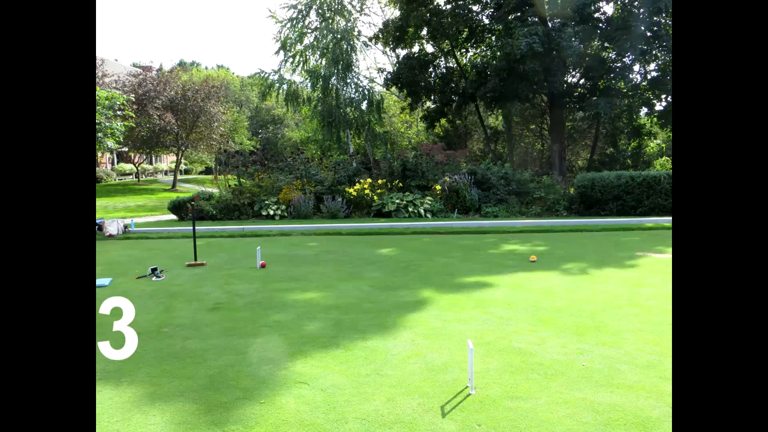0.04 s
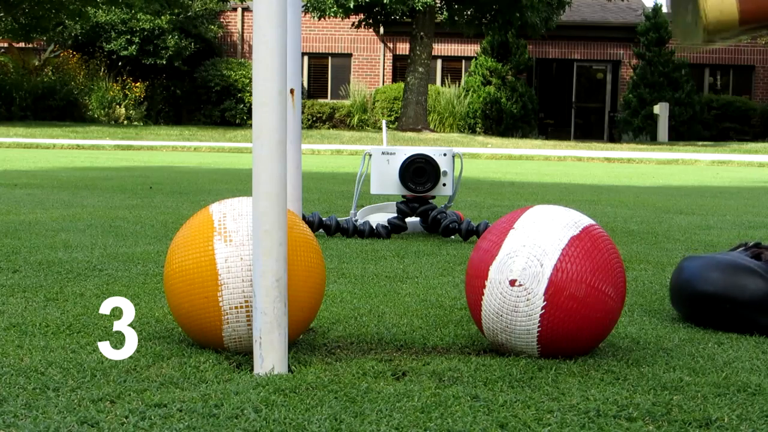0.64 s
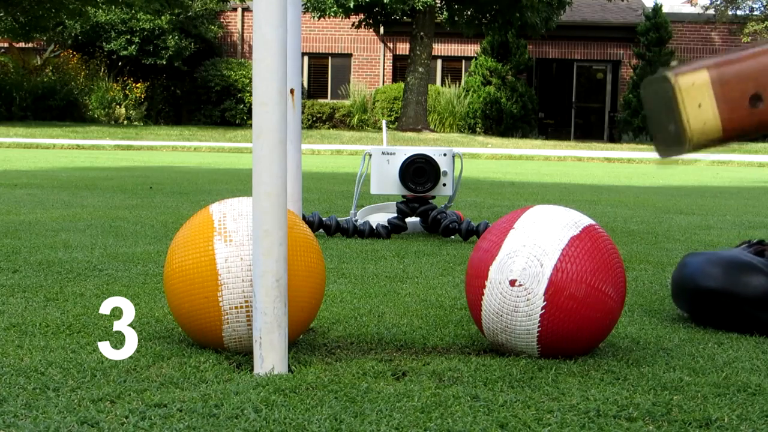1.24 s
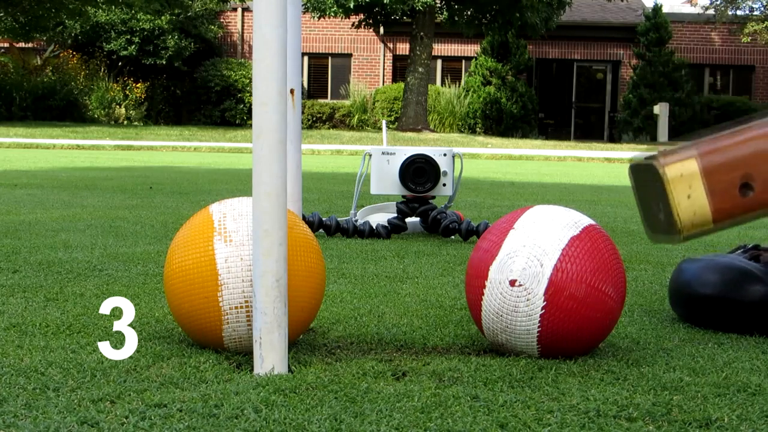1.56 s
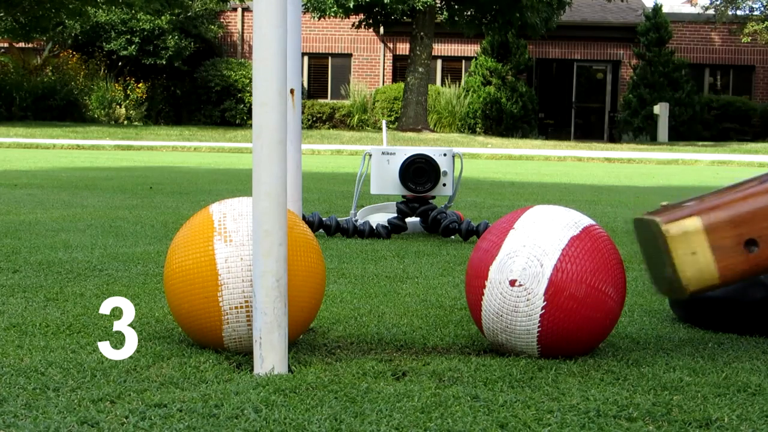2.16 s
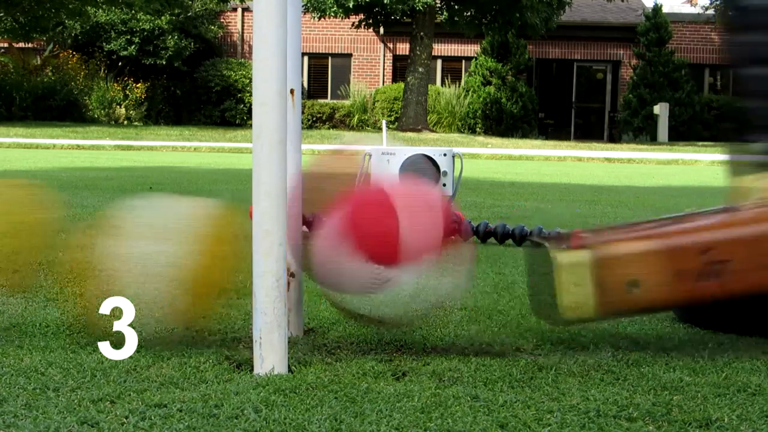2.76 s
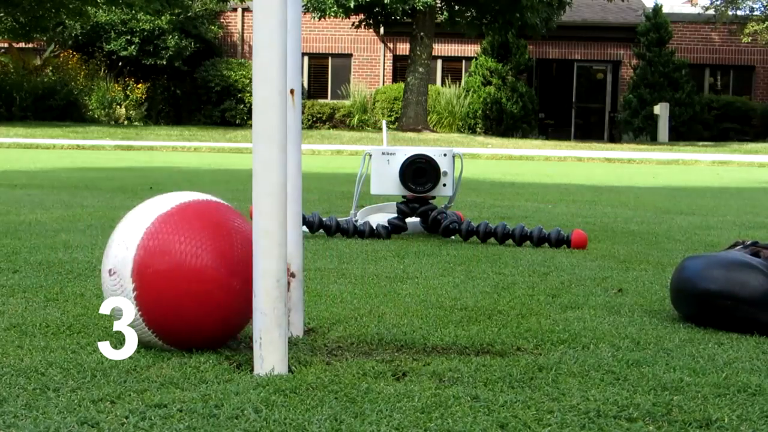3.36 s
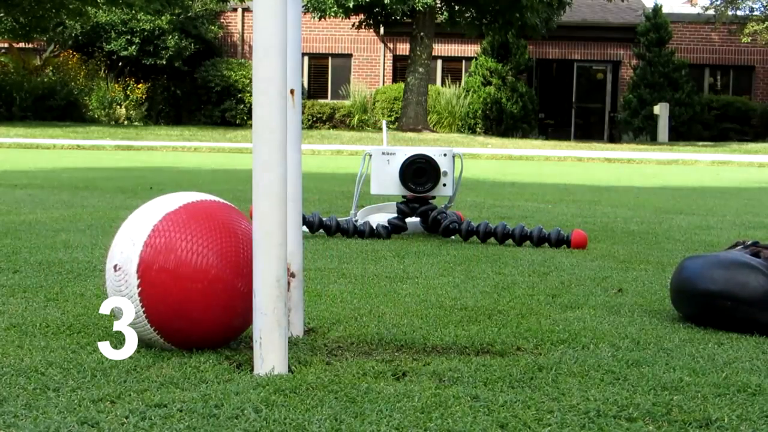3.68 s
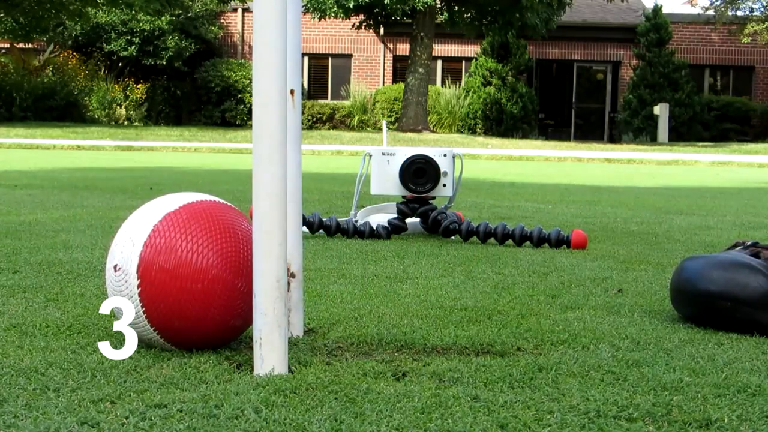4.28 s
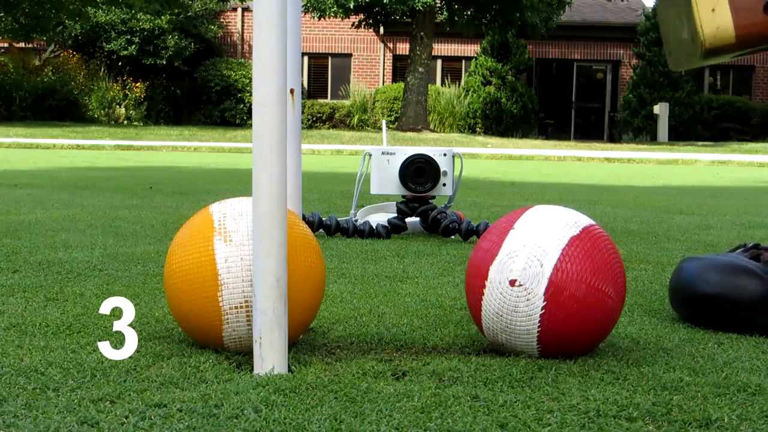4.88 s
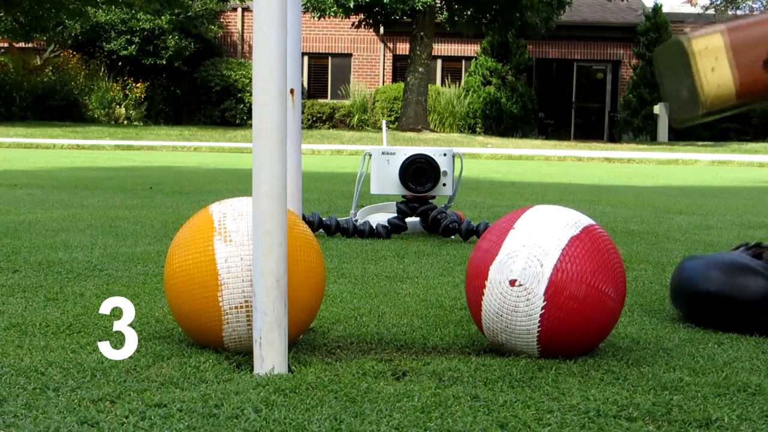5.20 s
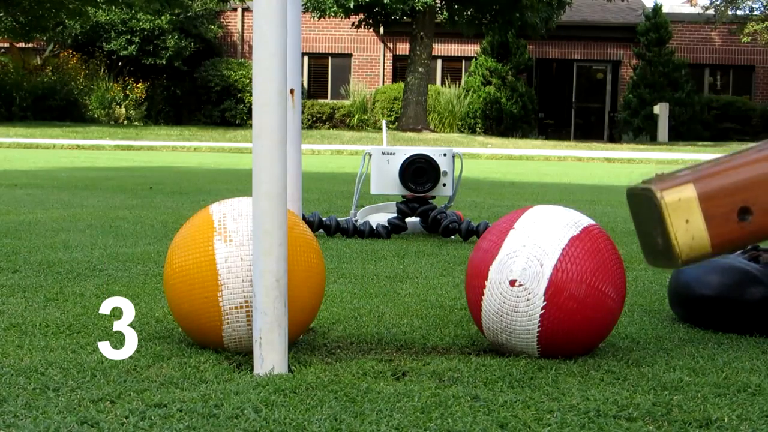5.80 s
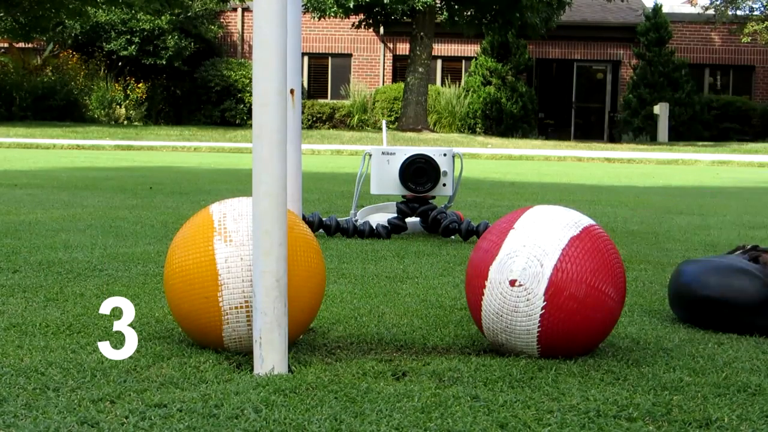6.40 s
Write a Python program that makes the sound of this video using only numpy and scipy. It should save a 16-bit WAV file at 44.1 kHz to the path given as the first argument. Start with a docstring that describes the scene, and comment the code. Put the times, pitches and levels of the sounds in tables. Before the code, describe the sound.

A wooden mallet cracks a croquet ball into another, followed by a few quick knocks, over faint insects on a lawn.

```python
"""A lawn beside a building: cicadas, a katydid and a tree cricket sing over rumble, hiss and a thin whine.
A wooden mallet cracks into a croquet ball close by; the ball clacks into a second ball, hops on the
turf and knocks the hoop. Each hit is a few fast-dying tones, and the building throws the crack back.
The crack overloads the microphone and ducks its gain.
The sound cuts in from silence and ends by jumping back to the quiet before the stroke."""
import sys
import numpy as np
from scipy import signal
from scipy.fft import rfft, irfft
from scipy.io import wavfile
from scipy.ndimage import minimum_filter1d

SR = 44100
rng = np.random.default_rng(int(sys.argv[2]) if len(sys.argv) > 2 else 0)


def wav_out(sig):
    """Save sig, one row per channel (or a flat mono array), as 16-bit PCM at SR to the path in sys.argv[1]."""
    wavfile.write(sys.argv[1], SR, np.round(np.clip(np.atleast_2d(sig).T, -1, 1) * 32767).astype(np.int16))


N = 284445
TIME = np.arange(N) / SR
FREQ_HZ = np.fft.rfftfreq(N, 1 / SR)
RING_TIME = np.arange(SR // 10) / SR

# Tone colour of the open air: freq_hz, relative_db
AIR_COLOUR = [(20, -26.5), (32, -3), (45, -1), (120, -2.5), (200, -2.5), (330, -4), (500, -8.5), (750, -7),
              (1200, -12), (2000, -15), (3300, -18), (5200, -22.5), (8500, -29.5), (12000, -37),
              (15500, -47.5)]
# How far the air leans to the left: freq_hz, left_minus_right_db
AIR_BALANCE = [(25, 6.5), (60, 12), (110, 16), (200, 13), (380, 8.5), (700, 3.5), (1290, 0.5), (2400, 1),
               (8000, 2.5), (15000, -1)]
# How alike the air is on the two sides: freq_hz, likeness (0 to 1)
AIR_LIKENESS = [(80, 0.43), (280, 0.54), (700, 0.56), (1400, 0.62), (2200, 0.45), (15000, .18)]
# Phase by which the air's right side leads: freq_hz, lead_rad
AIR_LEAD = [(80, 3.3), (300, 2.02), (700, 2.07), (1600, 3.06), (3000, 1.56), (5000, 2), (10000, 2.5)]
# Breeze in the leaves, a fader curve for the hiss, taken relative to a lull: time_s, level_db
BREEZE = [(0.52, -71), (0.87, -71), (2.2, -73.5), (2.85, -72.5)]
# Thin, high whine tones: pitch_hz, rms_db
WHINE_TONES = [(7867, -69.5), (11832, -88), (15734, -78)]
# Tone colour of the cicada chorus: freq_hz, relative_db
CICADA_COLOUR = [(5200, -20), (5700, -4), (6200, -4), (6600, -4), (6800, -0.5), (7100, -6), (7550, -1),
                 (7900, -9.5), (8200, -16), (9000, -45)]
# The tree cricket's trills: start_s, end_s, level_db
CRICKET_TRILLS = [(0.675, 2.06, -60), (3.055, 4.7, -59.5)]
# Light taps and ticks from elsewhere on the lawn: start_s, level_db, pitch_hz
FAR_TAPS = [(0.545, -30, 1070), (1.177, -39, 1050), (1.259, -38, 1200), (1.4073, -35, 3620),
            (2.478, -36, 980)]
# Tone colour of what the surroundings throw back: freq_hz, relative_db
SURROUND_COLOUR = [(200, -27), (600, -2.5), (1200, -5.5), (2000, -0.5), (3200, -12), (5400, -9), (8000, -7),
                   (15000, -10)]
# Tone colour of the building's echo: freq_hz, relative_db
WALL_COLOUR = [(500, -22), (1200, -18), (1800, -2), (2600, -14), (4200, -21), (5300, -1), (6500, -14),
               (12000, -14)]
# Thud of turf pressed by the ball: pitch_hz, relative_db, t60_s
TURF_MODES = [(426, -40, 0.01)]
# Click of a ball's hard shell: pitch_hz, relative_db, t60_s
SHELL_MODES = [(2560, 3.5, 0.0027), (3750, -5, 0.0062), (4440, -2, 0.0085), (6500, -13, 0.0073),
               (8640, -4, 0.0059), (12000, -2, 0.0023)]
# The struck ball meets ball, turf and hoop: start_s, relative_db, thump_pitch_hz, hardness_db
BALL_KNOCKS = [(2.9450, 10, 1054, -18), (2.9715, -22, 820, -24), (3.015, -7, 810, -28),
               (3.04, -22.5, 940, -15), (3.087, -20.5, 740, -29), (3.1725, -10.5, 640, -34),
               (3.2104, -3, 668, -24.5), (3.246, -25, 550, -26)]
# Crack of the mallet head on the ball: pitch_hz, level_db, t60_s
MALLET_MODES = [(690, 2, .0077), (884, 3.2, .0087), (1420, -6, .014), (1945, -6.8, .023), (3148, -4, .007),
                (3730, 3, .0043), (4520, 2.2, .0058), (5273, -4, .0055), (6478, -14, .008),
                (9800, -19, .004), (12000, -21, .003)]


def gain_of(db):
    """Decibels to amplitude."""
    return 10 ** (np.asarray(db) / 20)


def unit_rms(x):
    """Scales to rms 1."""
    return x / np.sqrt(np.mean(x ** 2) + 1e-20)


def curve(points):
    """Draws a curve through points on a log-frequency axis, one value a bin."""
    hz, value = np.transpose(points)
    return np.interp(np.log(FREQ_HZ + 1), np.log(hz + 1), value)


def add(mix, start_s, sound):
    """Drops a sound into the mix at a time."""
    part = mix[round(start_s * SR):][:len(sound)]
    part += sound[:len(part)]


def drift(rate_hz):
    """Slow random wander of rms 1."""
    lowpass = np.exp(-np.minimum(FREQ_HZ / rate_hz, 20) ** 2)
    return unit_rms(irfft(rfft(rng.standard_normal(N)) * lowpass, N))


def stereo_noise(colour, likeness, lead_rad=0):
    """Coloured noise of rms 1; the less alike its sides, the wider it sounds."""
    left, unrelated = rfft(rng.standard_normal((2, N)))
    right = likeness * np.exp(1j * lead_rad) * left + np.sqrt(1 - likeness ** 2) * unrelated
    return unit_rms(irfft(np.array([left, right]) * colour, N))


def pan(left_db):
    """Left and right gains for a left-minus-right level."""
    return gain_of(np.array([[.5], [-.5]]) * left_db)


def mic_ports(x, corner_hz):
    """Mono to stereo: the sound reaches the microphone's right port with less bass."""
    right = signal.lfilter(*signal.butter(1, corner_hz, "high", fs=SR), x)
    return np.array([x, right])


def ring(modes):
    """Dying sines of a struck body; neighbouring modes swing in opposite directions."""
    out = np.zeros(len(RING_TIME))
    for k, (hz, db, t60_s) in enumerate(modes):
        decay = np.exp(-np.log(1000) * RING_TIME / t60_s)
        out += (-1) ** k * gain_of(db) * decay * np.sin(2 * np.pi * hz * RING_TIME)
    return out


def swish(peak_s, length_s, hz, octaves):
    """A band of noise that swells and fades around a time."""
    band = np.exp(-.5 * (np.log2((FREQ_HZ + 1) / hz) / octaves) ** 2)
    swell = np.exp(-(2 * (TIME - peak_s) / length_s) ** 2)
    return stereo_noise(band, likeness=0.82) * swell


def air(level_db=-46, lumpy_db=0.45, split_hz=900, lull_db=-73.5):
    """The bed: a lumpy low rumble, heavier on the left, under leaf hiss that follows the breeze."""
    colour = gain_of(curve(AIR_COLOUR)) * pan(curve(AIR_BALANCE))
    wash = stereo_noise(colour, curve(AIR_LIKENESS), curve(AIR_LEAD))
    rumble = irfft(rfft(wash) / (1 + (FREQ_HZ / split_hz) ** 2), N)
    breeze_db = np.interp(TIME, *np.transpose(BREEZE)) - lull_db
    leaves = (wash - rumble) * gain_of(breeze_db)
    return gain_of(level_db) * (rumble * gain_of(lumpy_db * drift(18)) + leaves)


def hum(hz=1513, level_db=-76):
    """A faint, steady, far-off note."""
    return np.sqrt(2) * gain_of(level_db) * np.sin(2 * np.pi * hz * TIME)


def whine(tremolo_hz=14.3, tremolo_depth=.4):
    """Thin, steady high whine tones, with a slight fast tremolo on the highest."""
    tones = [np.sqrt(2) * gain_of(db) * np.sin(2 * np.pi * hz * TIME) for hz, db in WHINE_TONES]
    tremolo = 1 + tremolo_depth * np.sin(2 * np.pi * tremolo_hz * TIME)
    return sum(tones[:-1]) + tones[-1] * tremolo


def cicadas(level_db=-57.5, left_db=5.5, flutter_db=0.66):
    """Many far cicadas merge into a steady band of sizzle."""
    level = gain_of(level_db + flutter_db * drift(30))
    sizzle = stereo_noise(gain_of(curve(CICADA_COLOUR)), likeness=0.54)
    return level * sizzle * pan(left_db)


def chirr(level_db=-60, rasp_db=3, rasp_hz=60):
    """A far call from the trees: one narrow swell of noise with a raspy grain."""
    call = swish(peak_s=0.72, length_s=0.58, hz=2160, octaves=0.14)
    rasp = unit_rms(gain_of(rasp_db * drift(rasp_hz)))
    return gain_of(level_db) * call * rasp


def katydid(hz=5700, waver_hz=34, strokes_per_s=39.3, level_db=-66, left_db=4):
    """Scraping wings chop a high, wavering note into pulses, one a stroke."""
    phase = 2 * np.pi * np.cumsum(hz + waver_hz * drift(70)) / SR
    note = unit_rms(np.sin(phase)) * gain_of(1.5 * drift(30))
    strokes = np.cumsum(strokes_per_s * (1 + 0.053 * drift(15))) / SR
    pulses = unit_rms(abs(np.sin(np.pi * strokes)) ** 4.3)
    return gain_of(level_db) * note * pulses * pan(left_db)


def tree_cricket(hz=2579, sag_hz=22, strokes_per_s=57.3, left_db=2):
    """Every wing stroke rings one near-pure note that sags in pitch; a trill swells in and stops dead."""
    swell_s, stop_s, jitter_rad, uneven_db = .025, .011, .42, 1.1
    strokes = np.cumsum(strokes_per_s * (1 + 0.0034 * drift(6))) / SR
    phase = 2 * np.pi * np.cumsum(hz + 5 * drift(4.24)) / SR + jitter_rad * drift(50)
    bend_rad = sag_hz / strokes_per_s * np.sin(2 * np.pi * strokes) + .5 * np.cos(2 * np.pi * strokes)
    pulses = abs(np.sin(np.pi * strokes)) ** 2.5 * gain_of(uneven_db * drift(35))
    song = unit_rms(pulses * np.sin(phase - bend_rad))
    trills = np.zeros(N)
    for start_s, end_s, db in CRICKET_TRILLS:
        swell = 1 - np.exp(-np.maximum(TIME - start_s, 0) / swell_s)
        trills += gain_of(db) * swell * np.clip((end_s - TIME) / stop_s, 0, 1)
    return song * trills * pan(left_db)


def far_taps(t60_cycles=13.5, left_db=1):
    """Faint contacts across the lawn, each one short dying note."""
    out = np.zeros(N)
    for start_s, db, hz in FAR_TAPS:
        add(out, start_s, ring([(hz, db, t60_cycles / hz)]))
    return mic_ports(out, corner_hz=1387) * pan(left_db)


def reflections(x, colour, level_db, t60_s, onset_s, delay_s=0):
    """Scattered sound builds up after the direct hit and dies away in a wide tail."""
    age_s = np.maximum(TIME - delay_s, 0)
    envelope = np.exp(-np.log(1000) * age_s / t60_s) * (1 - np.exp(-age_s / onset_s))
    tail = stereo_noise(gain_of(curve(colour)), likeness=0) * envelope
    tail = tail[:, :SR] / np.linalg.norm(tail[0])
    return gain_of(level_db) * signal.fftconvolve(x.mean(0)[None], tail, axes=1)[:, :N]


def backswing(level_db=-57):
    """A faint brush as the player draws the mallet back."""
    return gain_of(level_db) * swish(peak_s=2.515, length_s=0.083, hz=3600, octaves=.6)


def ball_knocks(left_db=3, bright_hz=6500, dulling=.6, low_cut_hz=220):
    """Each knock layers a swelling thump, a shell click and a turf thud, then a weaker rebound."""
    thump_t60_s, rebound_gain = 0.0053, 0.22
    swell_cycles, rebound_cycles = 0.37, 2.5  # a softer, lower thump swells slower and rebounds later
    out = np.zeros(N)
    for start_s, db, hz, hardness_db in BALL_KNOCKS:
        swell = (1 - np.exp(-RING_TIME * hz / swell_cycles)) ** 2
        thump = 2 * ring([(hz, db, thump_t60_s)]) * swell
        # A gentler contact lasts longer, so its click is duller.
        corner_hz = np.clip(bright_hz * gain_of(dulling * db), 3000, 16000)
        shell = signal.lfilter(*signal.butter(2, corner_hz, fs=SR), ring(SHELL_MODES))
        click = gain_of(db + hardness_db) * shell
        thud = gain_of(db - hardness_db) * ring(TURF_MODES)
        add(out, start_s, thump + click + thud)
        add(out, start_s + rebound_cycles / hz, rebound_gain * thump)
    # A small ball radiates little bass.
    out = signal.lfilter(*signal.butter(2, low_cut_hz, "high", fs=SR), out)
    return mic_ports(out, corner_hz=1387) * pan(left_db)


def mallet_crack(start_s=2.9244, turf_boost_db=20):
    """The mallet's face cracks against the ball and its head rings briefly; the turf thuds beneath."""
    out = np.zeros(N)
    add(out, start_s, ring(MALLET_MODES) + gain_of(turf_boost_db) * ring(TURF_MODES))
    return mic_ports(out, corner_hz=1000)


def scene():
    """The hits, thrown back by nearby hoop and turf, the building and far trees, over the lawn's bed."""
    hits = mallet_crack() + ball_knocks() + far_taps()
    near = reflections(hits, SURROUND_COLOUR, level_db=-14.5, t60_s=0.03, onset_s=0.0023)
    wall = reflections(hits, WALL_COLOUR, level_db=-33, t60_s=0.19, onset_s=.04, delay_s=0.056)
    trees = reflections(hits, SURROUND_COLOUR, level_db=-37, t60_s=0.55, onset_s=0.035)
    bed = air() + hum() + whine()
    play = backswing() + hits + near + wall + trees
    wildlife = chirr() + cicadas() + katydid() + tree_cricket()
    return bed + wildlife + play


def duck(x, threshold_db=-20, max_cut_db=16, attack_s=.006, hold_s=0.2, recover_s=0.49):
    """Gain control: the level falls within milliseconds of a peak, holds, then creeps back."""
    peak_db = 20 * np.log10(abs(x).max(0) + 1e-9)
    over_db = np.clip(peak_db - threshold_db, 1e-9, max_cut_db)
    window = 2 * int(hold_s * SR / 2) + 1
    held_db = -minimum_filter1d(-over_db, window, origin=window // 2)
    # The cut decays exponentially until a new peak tops it.
    recovery = TIME / recover_s
    released_db = np.exp(np.maximum.accumulate(np.log(held_db) + recovery) - recovery)
    pole = np.exp(-1 / (attack_s * SR))
    cut_db = signal.lfilter([1 - pole], [1, -pole], released_db)
    return x / gain_of(cut_db)


def record(dry, ceiling=.55, knee=6, open_s=0.495, jump_s=4.594, high_cut_hz=16550):
    """Ducks and overloads the mix, cuts in from silence, jumps back to the opening and trims the top."""
    x = duck(dry)
    x = x / (1 + (x / ceiling) ** knee) ** (1 / knee)  # soft clipping
    start, jump = round(open_s * SR), round(jump_s * SR)
    x = np.hstack([np.zeros((2, start)), x[:, start:jump], x[:, start:start + N - jump]])
    lowpass = signal.firwin(511, high_cut_hz, window=("kaiser", 9), fs=SR)
    return signal.oaconvolve(x, lowpass[None], "same")


dry = scene()
out = record(dry)
wav_out(out)
```